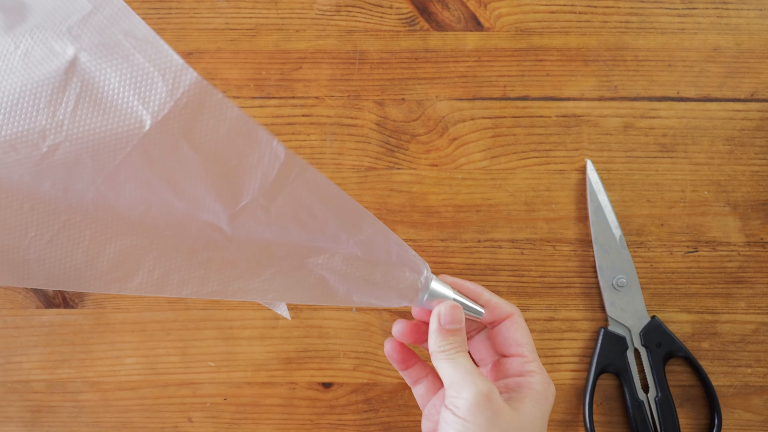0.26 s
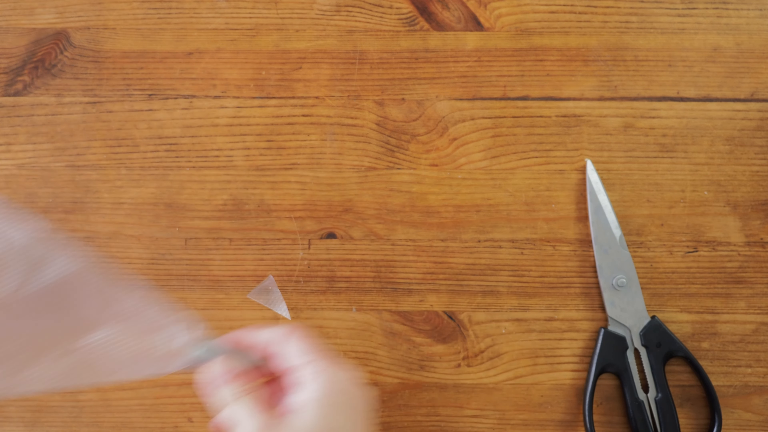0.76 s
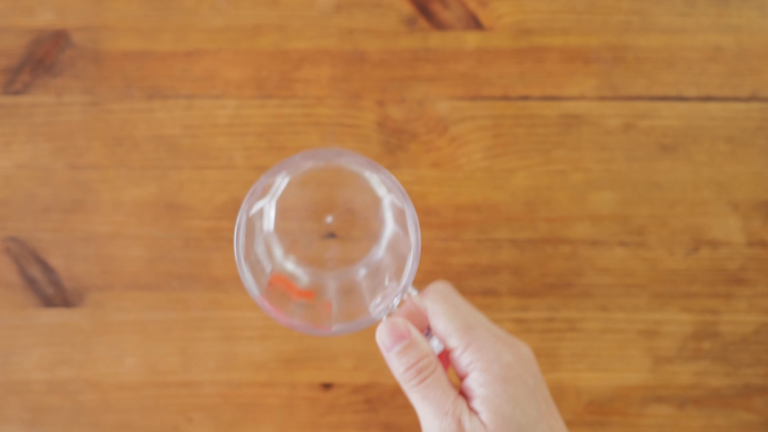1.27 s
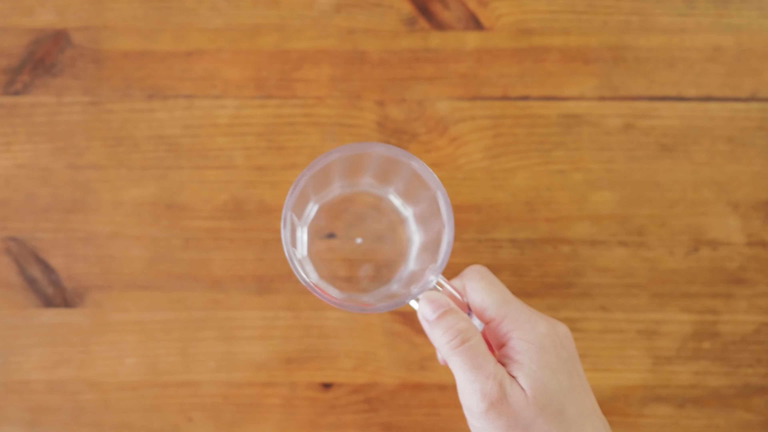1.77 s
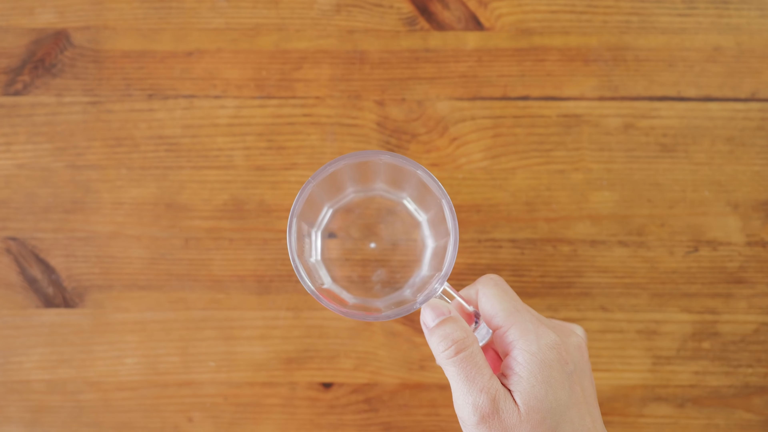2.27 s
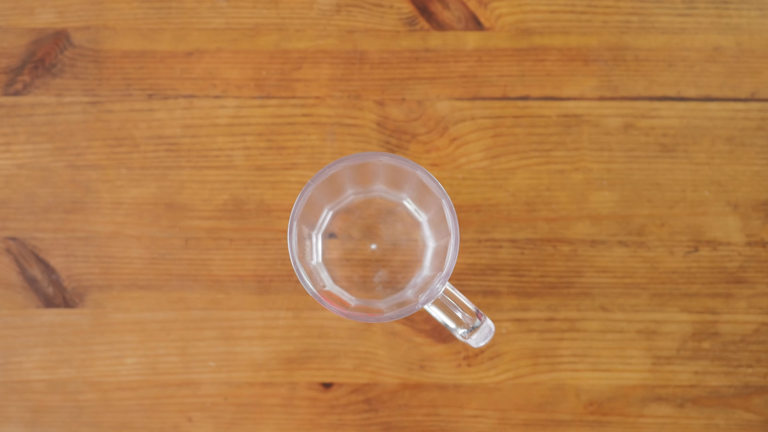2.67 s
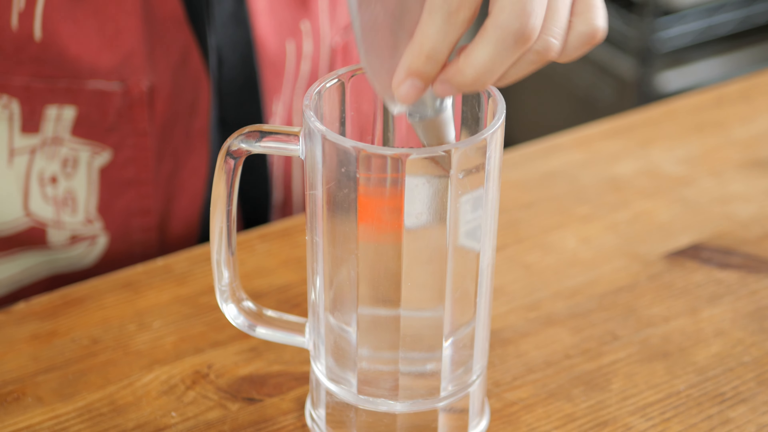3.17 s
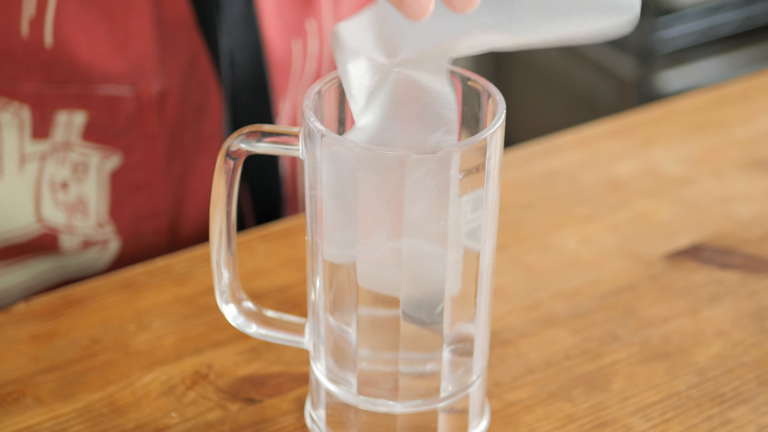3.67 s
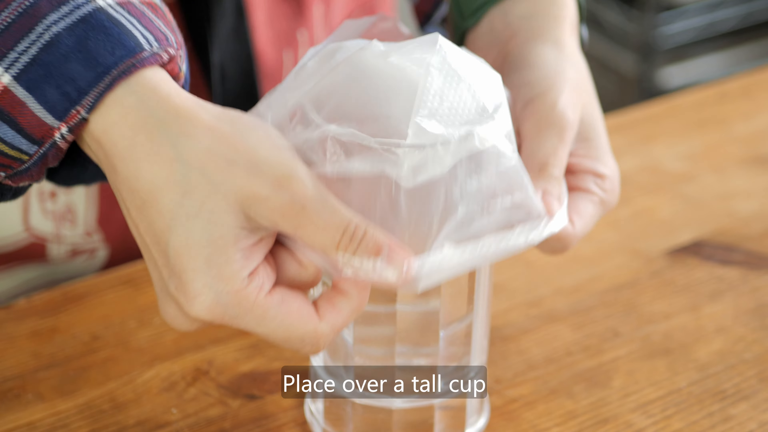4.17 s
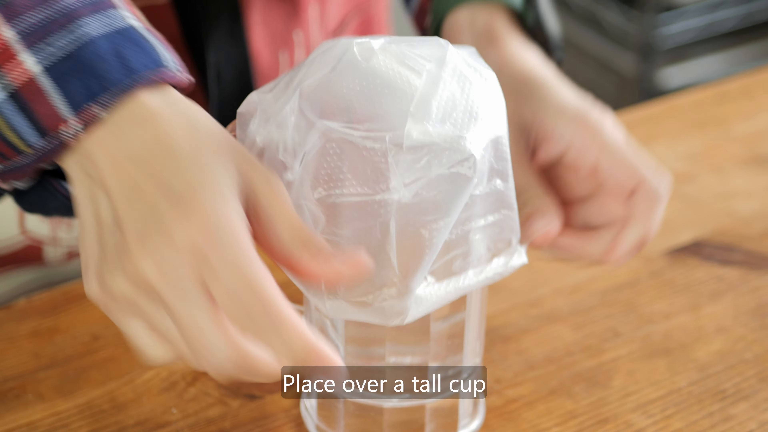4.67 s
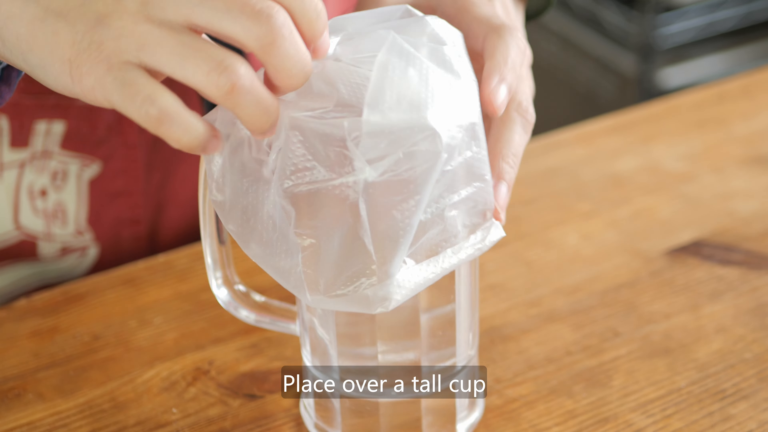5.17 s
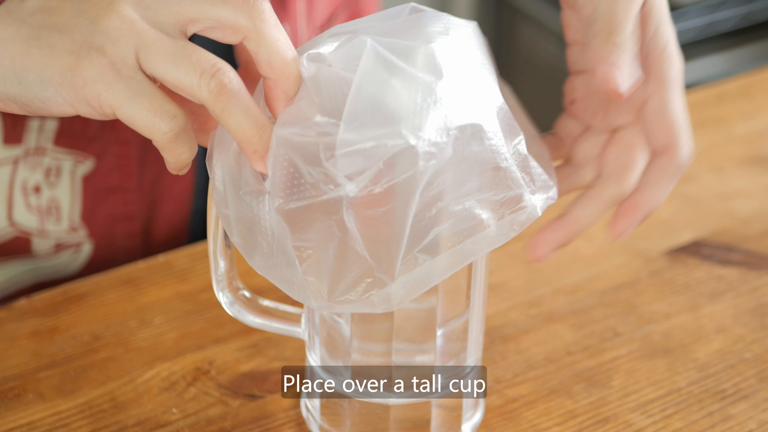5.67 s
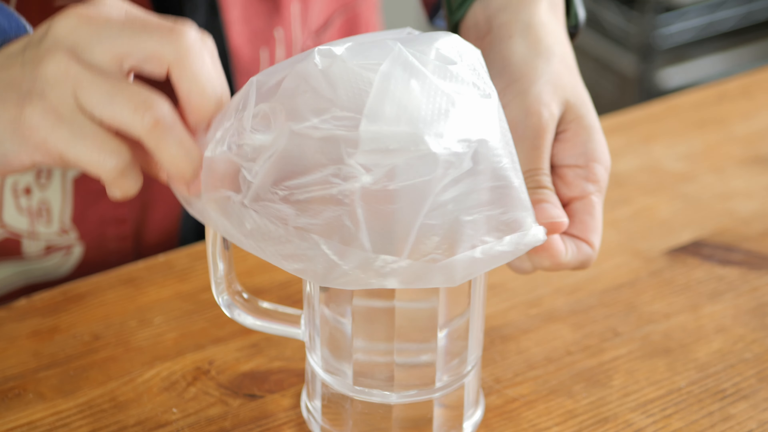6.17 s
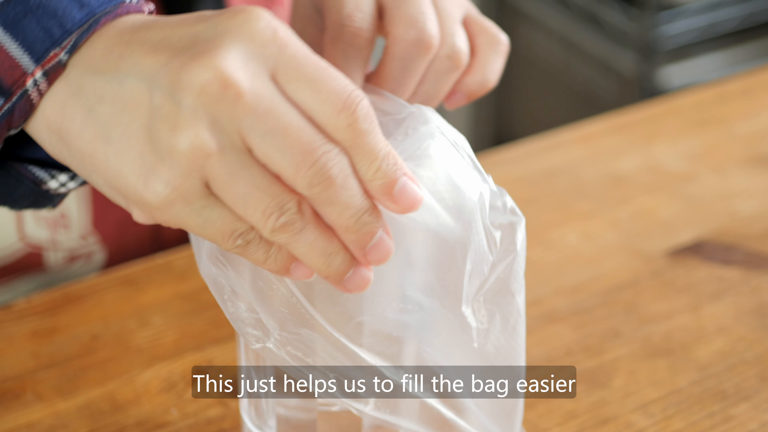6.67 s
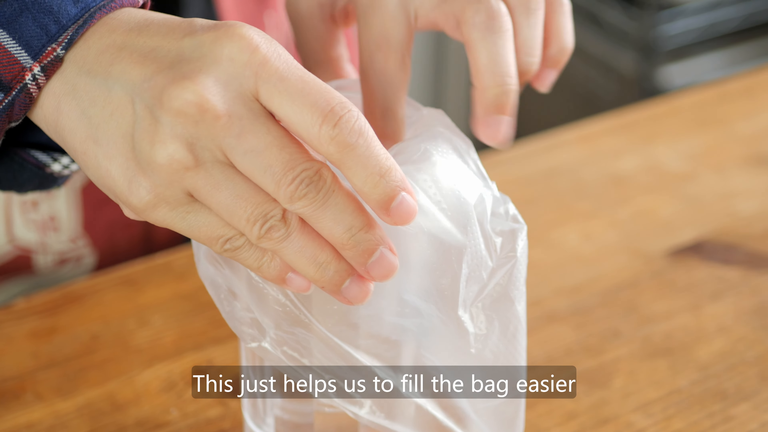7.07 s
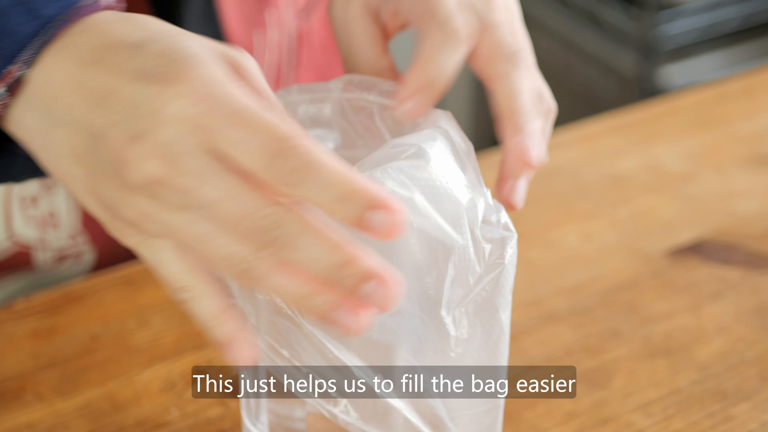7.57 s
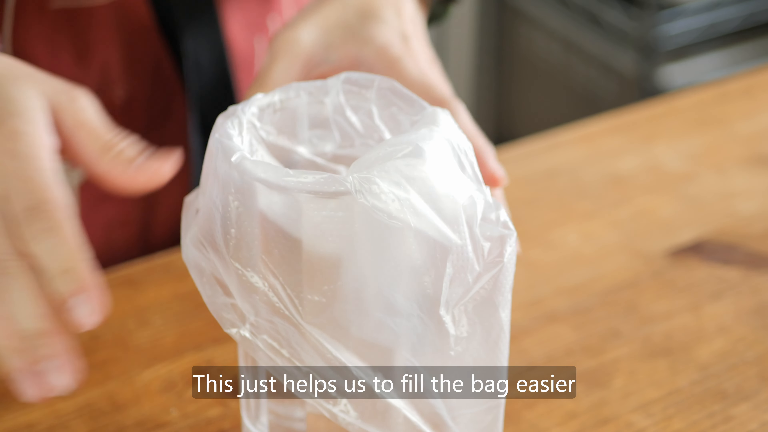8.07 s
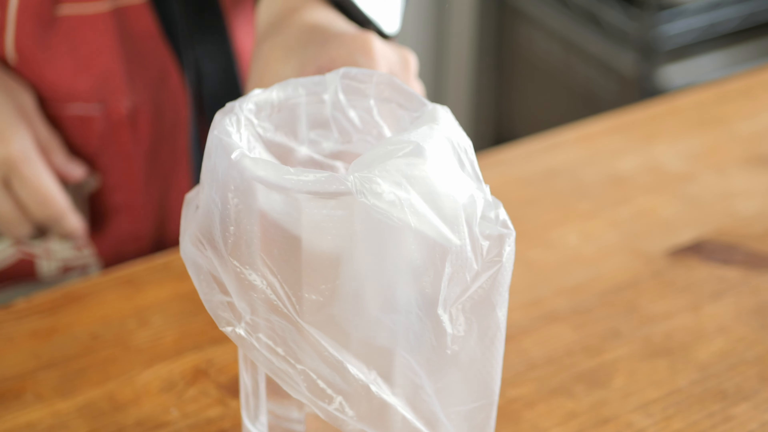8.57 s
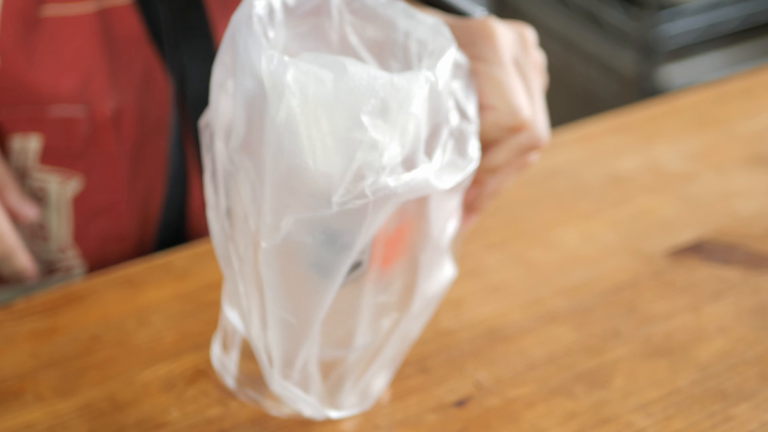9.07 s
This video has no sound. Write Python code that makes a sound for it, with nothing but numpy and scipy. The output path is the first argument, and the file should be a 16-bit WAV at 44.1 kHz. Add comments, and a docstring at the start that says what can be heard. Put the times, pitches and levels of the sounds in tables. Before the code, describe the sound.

Close and dry in a small kitchen with faint low rumble, gated to near silence in the gaps. From 0 to 0.4 s a thin plastic bag crackles with a few strong snaps, then dull weak rustles around 0.7-0.9 s. After a hush, a heavy mug knocks wood at 1.57 and again at 1.85 s, with a short glassy scrape; a tiny tap comes at 2.45 s. Light film rustles start around 2.55 s, turning brighter from 2.8 s, and a hollow mug resonance colours them near 3.4 s. A metal tip clinks at 3.48 s with tiny bounces. From 3.6 to 7.7 s dense, crisp crinkling and irregular snaps run almost continuously, with low mug bumps near 5.4, 6.7 and 7.6 s. Crackles thin out by 8.1 s; a faint tick at 8.4 s precedes renewed crinkling until 9.3 s, with a soft bump at 8.8 s.

```python
"""A small kitchen: a thin plastic piping bag is handled, dropped tip first into a tall mug, folded over its rim.
Film: impulsive creases and noise, coloured by the film's spectrum, brief pitched pockets and the mug's air.
Mug: damped swings for knocks, noise-driven modes of table and wall for rocking and sliding; arms thud softly.
Metal tip: decaying sine modes, struck once with two weak bounces; one faint tick is resonant noise.
The room adds a diffuse tail and low rumble; a noise gate in the recorder turns quiet passages down."""
import sys
import numpy as np
from scipy import signal
from scipy.fft import rfft, irfft
from scipy.io import wavfile
from scipy.ndimage import uniform_filter1d

SR = 44100
rng = np.random.default_rng(int(sys.argv[2]) if len(sys.argv) > 2 else 0)


def log_audio(samples):
    """Write samples as a 16-bit WAV file to the path given in sys.argv[1]."""
    # one column per channel
    frames = np.atleast_2d(samples).T
    # limit to full scale, then quantise
    limited = np.clip(frames, -1, 1)
    pcm = np.round(limited * 32767).astype(np.int16)
    wavfile.write(sys.argv[1], SR, pcm)


N = 411453  # samples


def gain_of(db):
    """Logarithmic level: decibels become an amplitude ratio."""
    return 10 ** (np.asarray(db) / 20)


def evened(x):
    """Power normalisation: scales to an rms of 1."""
    return x / np.sqrt(np.mean(x ** 2) + 1e-20)


def read(points, hz):
    """Spectral interpolation: straight lines over log frequency."""
    point_hz, value = np.transpose(points)
    return np.interp(np.log(hz + 1), np.log(point_hz + 1), value)


def follow(tables, column):
    """Control curves: joins a column of several tables, with -90 outside their time spans."""
    t = np.arange(N) / SR
    out = np.full(N, -90.)
    for rows in map(np.array, tables):
        inside = (t >= rows[0, 0]) & (t <= rows[-1, 0])
        out[inside] = np.interp(t[inside], rows[:, 0], rows[:, column])
    return out


def causal(gain, size=4096):
    """Minimum phase: the Hilbert transform of the log gain gives the phase; taps have energy 1."""
    both_sides = np.r_[gain, gain[-2:0:-1]]
    log_gain = np.log(np.maximum(both_sides, 1e-5))
    phase = -signal.hilbert(log_gain).imag
    taps = np.fft.ifft(np.exp(log_gain + 1j * phase)).real[:size // 2]
    return taps / np.linalg.norm(taps)


def resonate(x, hz, width_hz):
    """Damped resonance: one complex pole, with a gain near 1 at its centre."""
    radius = np.exp(-np.pi * width_hz / SR)
    pole = radius * np.exp(2j * np.pi * hz / SR)
    return 2 * signal.lfilter([1 - radius], [1, -pole], x).real


def body(x, modes):
    """Modal superposition: resonances add with alternating sign."""
    out = np.zeros(len(x))
    for k, (hz, width_hz, db) in enumerate(modes):
        out += (-1) ** k * gain_of(db) * resonate(x, hz, width_hz)
    return out


def burst(train, rise_ms, fall_ms):
    """Two-pole relaxation: each impulse swells quickly and falls exponentially."""
    for ms in (rise_ms, fall_ms):
        train = signal.lfilter([1], [1, -np.exp(-1000 / (ms * SR))], train)
    return train / (rise_ms * SR / 1000)


def swell(peak_s, db, rise_s, hold_s, fall_db_per_s):
    """Exponential envelope: climbs 30 dB in rise_s up to peak_s, holds for hold_s, then falls steadily."""
    late_s = np.arange(N) / SR - peak_s
    climb_db = late_s * 30 / rise_s
    fall_db = np.minimum(0, (hold_s - late_s) * fall_db_per_s)
    return gain_of(db + np.minimum(climb_db, fall_db))


# effort of the hands on the film, one curve per movement: time_s, level_db
HAND_EFFORT = [
    [(0.0, -26.5), (0.2, -33), (0.374, -39), (0.484, -73.5), (0.775, -64)],
    [(0.777, -53.5), (0.815, -41), (0.89, -58), (0.91, -72.5), (1.2, -85.5)],
    [(2.44, -73.5), (2.684, -56), (2.78, -73)],
    [(2.79, -82), (2.818, -36.5), (2.886, -61), (3.0, -61)],
    [(3.004, -35), (3.048, -43), (3.12, -67), (3.134, -34.5), (3.2, -39), (3.34, -56.5), (3.4, -41),
     (3.5, -50)],
    [(3.51, -46.5), (3.62, -34.5), (3.95, -28.5), (4.5, -27.5), (4.57, -33), (4.62, -29.5), (4.83, -30),
     (4.84, -51)],
    [(4.841, -49), (4.89, -36.5), (4.91, -28.5), (5.2, -33), (5.65, -31), (5.73, -35.5), (5.81, -40.5),
     (5.835, -57)],
    [(5.84, -27.5), (6.014, -26.5), (6.1, -30.5), (6.12, -33.5), (6.2, -29.5), (6.3, -25.5), (6.434, -29),
     (6.45, -82)],
    [(6.451, -53), (6.542, -28.5), (6.732, -32), (6.98, -39.5), (7.149, -55)],
    [(7.15, -52), (7.164, -30), (7.49, -35.5), (7.51, -55), (7.53, -31.5), (7.63, -32), (7.71, -44.5),
     (7.82, -78.5)],
    [(7.86, -45), (8.07, -44.5), (8.2, -103)],
    [(8.44, -91), (8.472, -66.5), (8.48, -43), (8.5, -37.5), (8.752, -37.5), (8.932, -62.5)],
    [(8.946, -40), (9.092, -37.5), (9.2, -41.5), (9.305, -60), (9.309, -40), (9.33, -44)],
]


def hand_effort():
    """Driving force: the level of the hands' work over time, in dB."""
    return follow(HAND_EFFORT, 1)


# colour of the film as the bag changes shape:
# time_s, boom_db (trapped air), low_rustle_db, brightness_db
BAG_SHAPE = [(0, -5, 0.5, -9.5), (.7, -1, 2, -18), (.85, 2.5, 5.5, -9.5), (2.6, -14.5, -4, -9.5),
             (3.1, -6, 3.5, 4), (3.6, -9, -2, -8), (4.3, -5, -4.5, -4), (4.57, -6.5, -4, -4.5),
             (5.2, -4, -2.5, -5.5), (6.0, -8, -4.5, -6), (6.7, -4, -4, -5.5), (7.4, -2.5, 0, -6),
             (8.0, -5, -2.5, -3.5), (8.7, -14, -3.5, -4), (9.33, 0.5, 3, -4)]
FIRM_DB = -28  # below this effort the film sounds deeper and duller
DEEPER, DULLER = 0.092, 0.32  # dB per dB of missing effort
WANDER_DB, WANDER_S = 2.5, 0.03  # rms drift of the colour as folds open and close, averaging time


def film_colour(level_db):
    """Force-dependent radiation: boom, low rustle, middle and brightness in dB; gentler is deeper, duller."""
    soft_db = np.clip(FIRM_DB - level_db, 0, 35)
    noise = rng.standard_normal((3, N))
    drift = WANDER_DB * evened(uniform_filter1d(noise, round(WANDER_S * SR), axis=1))
    boom, low, bright = (follow([BAG_SHAPE], k + 1) + drift[k] for k in range(3))
    return boom + DEEPER * soft_db, low + DEEPER * soft_db, 0 * soft_db, bright - DULLER * soft_db


def pockets(x, count=14, hold_ms=6., sharpness=5.9):
    """Switched resonance: every few ms a randomly picked taut pocket answers with its own brief pitch."""
    step = round(hold_ms * SR / 1000)
    pick = np.repeat(rng.integers(0, count, N // step + 1), step)[:N]
    out = np.zeros(N)
    for k, hz in enumerate(np.geomspace(600, 9000, count)):
        out += np.sqrt(sharpness / 2) * resonate(x * (pick == k), hz, hz / sharpness)
    return out


# air column of the mug: pitch_hz, width_hz, level_db
MUG_AIR = [(611.8, 22, 3.5), (1850, 17, 6), (2178, 18, 0.5), (3210, 140, -1), (4000, 330, -22),
           (6270, 96, -1)]
# how much of the air column is heard: time_s, level_db
MUG_OPENING = [(2.95, -14), (3.15, -1), (3.4, 10.5), (3.6, 1), (3.9, -6), (9.33, -14)]


def mug_air(x):
    """Air-column resonance: the mug's air answers the film while the mug is open."""
    return body(x * gain_of(follow([MUG_OPENING], 1)), MUG_AIR)


# spectrum of the film before its parts are reweighted: frequency_hz, level_db (per Hz)
FILM_SPECTRUM = [(88, -40), (150, -13), (175, -21), (235, -11), (275, -10), (431, 1), (702, 3),
                 (1240, -1.5), (1660, -2), (2310, -7.5), (2980, -2.5), (6140, 2), (9630, -7.5),
                 (14000, -6.5), (16000, -14.5)]
# borders between boom, low rustle, middle and bright part: frequency_hz
PART_EDGES_HZ = 1476, 3476, 9120


def film(boom, low, mid, bright):
    """Source-filter principle: four drives excite their parts of the film's spectrum, then pockets and mug."""
    hz = np.fft.rfftfreq(4096, 1 / SR)
    below = [1 / (1 + (hz / edge) ** 8) for edge in PART_EDGES_HZ]
    shares = below[0], below[1] - below[0], below[2] - below[1], 1 - below[2]
    colour = gain_of(read(FILM_SPECTRUM, hz))
    sound = np.zeros(N)
    for drive, share in zip((boom, low, mid, bright), shares):
        sound += signal.oaconvolve(drive, causal(colour * share))[:N]
    sound = 0.47 * sound + 0.43 * pockets(sound)
    return sound + mug_air(sound)


def crackle(per_s=700, spread_db=0.5, colour_db=3.0, fall_ms=0.74, rustle=0.37, gentle_db=-51.0):
    """Shot noise: many small creases of unequal size and colour over a soft continuous rustle."""
    happens = rng.random(N) < per_s / SR
    size = happens * gain_of(spread_db * np.minimum(rng.exponential(1, N), 2.3))
    noise = rng.standard_normal(N)
    level_db = hand_effort()
    firm = 1 / (1 + gain_of(gentle_db - level_db))  # gentle handling only swishes
    drives = []
    for extra_db in film_colour(level_db):
        tinted = size * gain_of(colour_db * rng.standard_normal(N))
        creases = evened(burst(tinted, 0.42, fall_ms) * noise)
        mixture = firm * creases + (1 - firm + rustle) * noise
        drives.append(gain_of(level_db + extra_db) * mixture)
    return film(*drives)


# low room noise, relative spectrum: frequency_hz, level_db (per Hz)
RUMBLE_SPECTRUM = [(12, -49), (20, -29), (32, -19), (45, -11.5), (65, -9), (134, -23), (182, -21.5),
                   (319, -32), (678, -35), (2390, -44), (16000, -55.5)]


def rumble(level_db=-57.5):
    """Stationary filtered noise: the room's low background at a given rms level."""
    hz = np.fft.rfftfreq(N, 1 / SR)
    spectrum = rfft(rng.standard_normal(N)) * gain_of(read(RUMBLE_SPECTRUM, hz))
    return gain_of(level_db) * evened(irfft(spectrum, N))


# reverberation of the kitchen: frequency_hz, t60_s
KITCHEN_DECAY = [(200, 0.15), (800, 0.27), (3000, 0.058), (12000, 0.04)]


def kitchen(x, level_db=-16):
    """Diffuse reverberation: sparse echoes of random sign, each frequency dying at its own speed."""
    taps = np.zeros(SR // 2)
    at = np.arange(120, len(taps) - 20, 20)
    taps[at + rng.integers(0, 20, len(at))] = rng.choice([-1., 1.], len(at))
    hz, t, bands = signal.stft(taps, SR, nperseg=256)
    decay = gain_of(-60 * t / read(KITCHEN_DECAY, hz)[:, None])
    tail = signal.istft(bands * decay, SR, nperseg=256)[1]
    return gain_of(level_db) * signal.oaconvolve(x, tail / np.linalg.norm(tail))[:N]


SMALL_PER_S, SMALL_DB, SMALL_SPREAD_DB = 70, 9.5, 1.5  # rate, level above the effort, spread
SMALL_COLOUR_DB, SMALL_DEPTH_DB, SMALL_BRIGHT_DB = 7., -6, 0.5  # rms tint, depth and brightness offsets


def small_snaps():
    """Random point process: lesser creases at random moments, as strong as the hands work."""
    draw = rng.random((round(SMALL_PER_S * N / SR), 4))
    at = (draw[:, 0] * N).astype(int)
    level_db = hand_effort()
    _, low_db, _, bright_db = film_colour(level_db)
    tint_db = SMALL_COLOUR_DB * np.sqrt(12) * (draw[:, 2:] - .5)
    db = level_db[at] + SMALL_DB - SMALL_SPREAD_DB * np.log(1 - .9 * draw[:, 1])
    depth_db = low_db[at] + SMALL_DEPTH_DB + tint_db[:, 0]
    brightness_db = bright_db[at] + SMALL_BRIGHT_DB + tint_db[:, 1]
    return np.c_[at / SR, db, depth_db, brightness_db]


# the loudest creases that snap, levels of their drives:
# start_s, level_db, depth_db and brightness_db (both relative to the level)
LOUD_SNAPS = [(0.0618, -18, -0.5, -4), (0.155, -10.5, -3, -8.5), (0.177, -7, -13.5, -9),
              (0.1989, -15, -24, -11.5), (0.29, -6, -5, -23), (0.3176, -17, 2, -26),
              (0.3406, -28, -2.5, -22.5), (0.374, -25, 9, -14), (0.661, -31.5, 0, -29),
              (0.693, -24.5, 1, -31), (0.7218, -32.5, 2, -27), (0.7607, -42, 4, -19),
              (0.7852, -21.5, 6, -11), (0.8085, -25, 10, -13), (0.8744, -35.5, -9, -16),
              (2.55, -32, -2, -25), (2.584, -25.5, -4.5, -27), (2.646, -37, 0, -9), (2.665, -26, 1, 6.5),
              (2.8, -38.5, 0, -14), (2.819, -15, -1.5, -6), (2.911, -43, 8, -13), (2.963, -27, 4.5, -5),
              (3.0067, -10, -6, -10), (3.0179, -13.5, -12, -8.5), (3.037, -18, -5, -9),
              (3.051, -13, -2, -10), (3.1376, -14, -10, -9), (3.1494, -21, -9, -7), (3.1656, -11, 5.5, -1),
              (3.2008, -14.5, -5, 5.5), (3.2214, -14, -15.5, 3.5), (3.241, -22, -6, -7),
              (3.2538, -14, -6.5, -2), (3.269, -9.5, 0, -5), (3.2772, -15.5, -8, 5),
              (3.315, -14.5, -4, -11.5), (3.3573, -16.5, -2, -10), (3.371, -8, -9.5, -7.5),
              (3.4033, -14, -2.5, -10), (3.4222, -19, -11, -10), (3.456, -23, -9, -8),
              (3.468, -7.5, -3.5, -16), (3.5593, -19, 3, -5), (3.5984, -10, -6, -7),
              (3.6399, -10.5, -12, 5), (3.6647, -19, -3, -10), (3.707, -8.5, -2.5, -6),
              (3.7511, -8, -16, -5), (3.818, -5.5, -15, -4.5), (3.8497, -10.5, -8, -3),
              (3.8745, -8.5, -4.5, -5), (3.901, -5.5, -1, -3), (3.929, -13, -2, -11),
              (3.9514, -13, -4, -13), (3.9799, -4.5, -10, -12), (4.0257, -9, -5, -9), (4.058, -16, 4, -9),
              (4.0721, -11, -6, -7), (4.0975, -10, -15, -4), (4.116, -11, -13, -7), (4.147, -4.5, -8, -17),
              (4.2382, -10, -3, -3), (4.2633, -8, -6, -7), (4.2906, -13.5, 1, -11), (4.329, -18, 5, -12),
              (4.35, -13.5, 2, -6.5), (4.395, -13, -8, -9), (4.5433, -9.5, -9.5, -3), (4.586, -7.5, -6, -7),
              (4.6055, -11.5, 2.5, -7), (4.627, -12, -18, -7.5), (4.6435, -18, -6, -12),
              (4.6917, -10, -8, 0), (4.735, -5, -16, -9), (4.8023, -10, -15, -17), (4.8237, -11, -6, -37.5),
              (4.858, -16, 3, -7), (4.8683, -24, -1, -10), (4.8978, -8.5, 1, -9.5), (4.9538, -10, 1, 0),
              (4.9731, -14, -6, -9), (5.0162, -3.5, -12, -5.5), (5.058, -11, -11, -7), (5.129, -8, -7, -2),
              (5.226, -12, -13, -12), (5.2802, -8, 1.5, -0.5), (5.3297, -5.5, -7, -4.5),
              (5.3785, -10, -6, 1), (5.4249, -9, -0.5, -3), (5.499, -10.5, 1, -10), (5.5191, -8, -3, 1.5),
              (5.6025, -8.5, -3, 0.5), (5.6654, -4.5, -22, -13), (5.7044, -22, -3, -7),
              (5.7233, -9, -17, -6), (5.7424, -8.5, -3, -4.5), (5.7794, -29, -1, -12),
              (5.796, -20.5, 1, -19), (5.8385, -18, 0, -7), (5.8564, -7.5, -2, -7), (5.8775, -18, -5, -7.5),
              (5.9244, -12, -5, -8), (5.9449, -23, -16, -10), (6.0452, -19, -6, -8), (6.0866, -13, -14, -7),
              (6.098, -8.5, -25, -1), (6.1374, -10, -14.5, 1), (6.1694, -7, 1, -5), (6.1888, -12, -9, -13),
              (6.2214, -12, -1, -19.5), (6.2387, -16, 0, -7), (6.2712, -14, -12, -10),
              (6.3384, -13, -8, -17), (6.4301, -8, -10, -2), (6.4981, -31, -8, -7), (6.5164, -8, -1, -15),
              (6.547, -13, -15.5, -14), (6.5787, -7, -13.5, -8), (6.6395, -5.5, -4, -14),
              (6.6575, -11, 1, 6), (6.6927, -11.5, -7, -7), (6.7131, -25, -23, -4), (6.7486, -15, -9, 2),
              (6.8132, -7.5, -5, 0), (6.832, -16.5, -5, -3), (6.8587, -9.5, 5, -10),
              (6.9057, -10, -2.5, -4), (6.9202, -14, -2, -12), (6.9509, -14, 12, -6), (6.974, -17, -5, -9),
              (7.003, -13, -1, -10), (7.0214, -12.5, -4.5, -2), (7.0308, -14, -5, -4.5),
              (7.0488, -18, -1, -16), (7.0646, -24.5, 1, -13), (7.0977, -22.5, -6.5, -4),
              (7.1608, -14.5, -2, -9), (7.193, -19, -6, -11), (7.2088, -14, -11, -8.5), (7.23, -4, -5, -5),
              (7.2413, -7.5, -5, -3.5), (7.2681, -8.5, -1.5, -4), (7.2912, -8.5, -4.5, -2.5),
              (7.313, -9, -5.5, -2), (7.3255, -8.5, -0.5, -3.5), (7.3456, -7.5, -1, 0.5),
              (7.3916, -9.5, -1.5, -2.5), (7.4086, -10, -7, -4), (7.444, -12.5, -1, -2.5),
              (7.5168, -9, -9, -13.5), (7.5449, -9, -2, -8), (7.5832, -8, -6, -8), (7.6094, -15, -13, -5),
              (7.656, -10, -8, -7), (7.6752, -9.5, -0.5, -3), (7.7134, -13.5, -1, -6),
              (7.85, -39.5, 0.5, -17), (7.8666, -10, -3, -4), (7.883, -11, -1, -13), (7.9237, -21, -5, -7),
              (7.9674, -5.5, -9, -16), (8.0065, -22, 0, -12), (8.0346, -18, -8.5, 4),
              (8.0615, -19.5, -1.5, -20), (8.1012, -45, -6, -6.5), (8.477, -29, -4, -8),
              (8.4855, -19.5, -2, -4), (8.4965, -14, -2, -2), (8.5133, -14, -0.5, -1),
              (8.5457, -13, -2, -7), (8.581, -3.5, -6.5, -10), (8.6397, -10, -3, -5),
              (8.7046, -14.5, -10, -1), (8.74, -11.5, -10, -2), (8.768, -12.5, -6, 0),
              (8.7956, -12.5, -18, -7), (8.8218, -26, -7, 5), (8.8665, -28, -10, -15),
              (8.9444, -22.5, 0.5, -5), (8.971, -7, -9.5, -5), (9.018, -17, -11, -9),
              (9.0399, -16, 1.5, -3), (9.0785, -9, -5, -4), (9.1448, -24, -17, 3), (9.1863, -7.5, -5.5, -2),
              (9.2213, -25, 9.5, 2), (9.251, -16.5, -4.5, 5), (9.3062, -15, -6, -7)]
SNAP_BOOM_DB = -5  # boom relative to the low rustle


def snaps(rise_ms=.6, fall_ms=0.29, tail_ms=2.5, tail_db=-9.):
    """Snap-through buckling: each crease flips with a click in a short burst, then the film shivers."""
    start_s, db, depth_db, bright_db = np.r_[LOUD_SNAPS, small_snaps()].T
    at = np.clip((start_s * SR).astype(int), 0, N - 1)
    noise = rng.standard_normal(N)
    drives = []
    for extra_db in (depth_db + SNAP_BOOM_DB, depth_db, 0, bright_db):
        train = np.zeros(N)
        np.add.at(train, at, gain_of(db + extra_db))
        flip = burst(train, rise_ms, fall_ms)
        shiver = gain_of(tail_db) * burst(train, rise_ms, tail_ms)
        click = 0.5 * np.roll(train, round(rise_ms * SR / 1000))
        drives.append((flip + shiver) * noise + click)
    return film(*drives)


# arms and hands thud faintly on the table: peak_s, level_db
ARM_THUDS = [(.91, -50), (1.1, -53), (1.2, -63), (1.35, -59.5), (3.038, -43), (3.16, -40.5), (3.436, -45.5)]


def thuds(rise_s=0.096, fall_db_per_s=180):
    """Low-mode excitation: soft contacts shape noise in a twice-applied 62 Hz resonance."""
    low = resonate(resonate(rng.standard_normal(N), 62, 70), 62, 70)
    envelope = sum(swell(peak_s, db, rise_s, 0, fall_db_per_s) for peak_s, db in ARM_THUDS)
    return envelope * evened(low)


# the base slides and its wall sings: time_s, level_db, singing_share (0-1)
MUG_SLIDING = [(1.54, -84, .2), (1.567, -56.5, .05), (1.594, -71.5, 0.5), (1.74, -74, 0.5),
               (1.814, -61.5, 0.5), (1.828, -56, 0.2), (1.85, -41.5, 1), (1.866, -56.5, 1),
               (2.032, -61.5, 0.55), (2.15, -87, .7)]
# modes of the mug wall: pitch_hz, width_hz, level_db
MUG_WALL = [(2070, 21, 7), (2450, 66, 7.5), (3120, 34, 6), (3830, 22, -2.5), (4600, 50, 0.5),
            (6360, 57, -2), (6940, 26, -12.5), (7600, 35, -9), (11300, 35, -8.5)]


def sliding():
    """Friction excitation: gritty noise drives singing wall modes or a broad scrape, in changing shares."""
    grit = rng.standard_normal(N)
    sings = np.clip(follow([MUG_SLIDING], 2), 0, 1)
    song = evened(body(grit, MUG_WALL))
    scrape = evened(np.diff(resonate(grit, 2300, 4900), prepend=0))
    return gain_of(follow([MUG_SLIDING], 1)) * (sings * song + (1 - sings) * scrape)


# the mug rocks and drags on the wood: peak_s (moment when the climb is complete),
# level_db, rise_s, hold_s, fall_db_per_s, upper_modes_db (relative to the level)
MUG_ROCKING = [(1.564, -29.5, 0.0019, 0.059, 200.5, -15.5), (1.846, -32, .04, 0.023, 200, -5),
               (1.879, -34.5, .004, 0.047, 214, -5.5), (2.453, -42, 0.0034, 0.025, 250, -19),
               (3.884, -44, 0.046, .02, 200, -4), (4.058, -39, .05, 0.018, 198.5, -6.5),
               (5.359, -28, .004, 0.011, 399, -10), (6.092, -39.5, 0.014, 0.0075, 300, 2),
               (6.701, -28.5, 0.074, 0.018, 218.5, -4), (7.618, -24.5, 0.021, 0.028, 249, -11.5),
               (8.818, -38, 0.0097, 0.013, 348, -16)]
# modes of the table, the first five low, the rest upper: pitch_hz, width_hz, level_db
TABLE_MODES = [(62.2, 52, -14), (118, 8, -11), (225, 90, 1), (310, 60, 2), (440, 45, -0.5), (520, 67, -1),
               (784, 320, -8), (1100, 300, -12.5)]
CONTACT_DB, CONTACT_S = 8.5, 0.02  # hard first contact: above the upper modes, time to fall 30 dB


def rocking():
    """Rough-contact excitation: bumpy noise drives the table; a brief hard contact reaches the upper modes."""
    unevenness = evened(burst(rng.random(N) < 150 / SR, 0.82, 4.7))
    bumps = (1.08 + unevenness) * rng.standard_normal(N)
    low = evened(resonate(body(bumps, TABLE_MODES[:5]), 280, 560))
    upper = evened(resonate(body(bumps, TABLE_MODES[5:]), 750, 1500))
    out = np.zeros(N)
    for peak_s, db, rise_s, hold_s, fall, upper_db in MUG_ROCKING:
        drag = swell(peak_s, db + upper_db, rise_s, hold_s, fall)
        contact = swell(peak_s, db + upper_db + CONTACT_DB, 0.0021, 0, 30 / CONTACT_S)
        out += swell(peak_s, db, rise_s, hold_s, fall) * low + (drag + contact) * upper
    return out


# the mug base strikes the table: start_s, level_db, push_ms (first half swing)
MUG_KNOCKS = [(1.5668, -3.5, 1.17), (1.8461, -2.5, 1.2), (1.8775, -15, 1.4), (2.453, -31.5, 1.6),
              (5.362, -22, 1.56), (8.822, -28, 1.74)]


def knocks():
    """Impact pulse: each blow is one soft-edged, heavily damped swing."""
    out = np.zeros(N)
    for start_s, db, push_ms in MUG_KNOCKS:
        u = np.arange(1000) / SR / (push_ms / 1000)  # time in push lengths
        swing = np.sin(np.pi * u) * u * np.exp(-u / 0.52) * 4.0
        out[round(start_s * SR):][:len(u)] += gain_of(db) * swing
    return out


# modes of the metal tip: pitch_hz, level_db, t60_s (of the lingering part)
TIP_MODES = [(603, -26, .2), (2105, 0, .16), (4151, -6, .09), (6492, -22, .05), (9733, -34, .04)]
TIP_S = 3.4847  # the tip hits the bottom


def tip():
    """Two-stage modal decay: the metal tip rings, dying fast, then lingering, and bounces twice."""
    t = np.arange(SR // 4) / SR
    ring = np.zeros(len(t))
    for hz, db, t60_s in TIP_MODES:
        decay = .95 * gain_of(-60 * t / .012) + .16 * gain_of(-60 * t / t60_s)
        ring += gain_of(db) * np.sin(2 * np.pi * hz * t) * decay
    out = np.zeros(N)
    for late_s, db in ((0, -3), (.0115, -24), (.031, -26.5)):
        out[round((TIP_S + late_s) * SR):][:len(t)] += gain_of(db) * ring
    crack = gain_of(-22.0 - 60 * t / 0.015) * rng.standard_normal(len(t))  # of the first contact
    out[round(TIP_S * SR):][:len(t)] += crack
    return out


def tick(peak_s=8.394, level_db=-48.5, pitch_hz=2900, t60_s=0.028):
    """Resonant noise burst: one faint tick in the pause is a short puff in one resonance."""
    puff = evened(resonate(rng.standard_normal(N), pitch_hz, 600))
    return swell(peak_s, level_db, .002, 0, 60 / t60_s) * puff


def scene():
    """Direct and diffuse sound: bag, mug and tip in the kitchen; the tip is screened by the mug."""
    bag = crackle() + snaps()
    mug_on_table = thuds() + sliding() + rocking() + knocks()
    near = bag + mug_on_table + tick()
    ring = tip()
    room = kitchen(near + gain_of(-13.5) * ring)
    return (near + ring + room + rumble())[None]


def record(dry):
    """Downward expansion: bass roll-off, a gate lowering quiet passages, clipping, then the band limit."""
    dry = signal.lfilter(*signal.butter(2, 48., "high", fs=SR), dry)
    power = abs(uniform_filter1d(dry[0] ** 2, size=1800))
    power_db = 10 * np.log10(power + 1e-12)
    shut_db = np.clip(2.07 * (power_db + 51), -18, 0)  # starts to close below -51 dB
    gated = np.clip(dry * gain_of(uniform_filter1d(shut_db, size=900)), -1, 1)
    band_limit = signal.firwin(511, 16000, window=("kaiser", 9), fs=SR)
    return signal.oaconvolve(gated, band_limit[None], "same")


dry = scene()
out = record(dry)
log_audio(out)
```